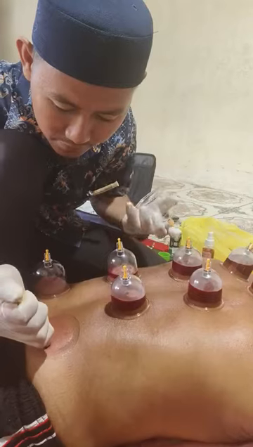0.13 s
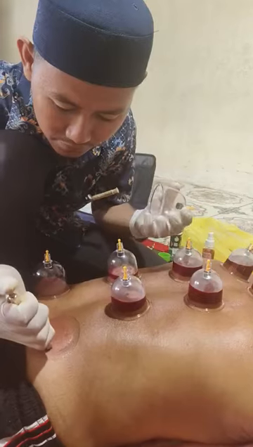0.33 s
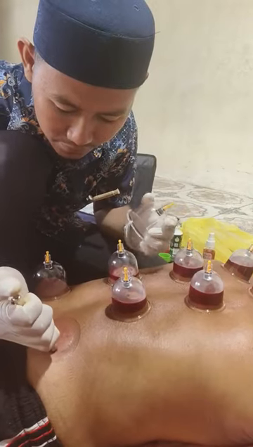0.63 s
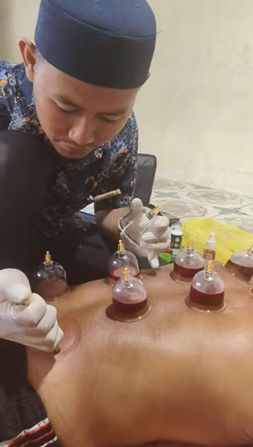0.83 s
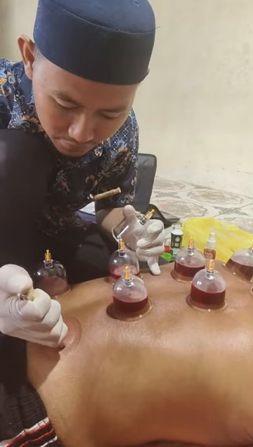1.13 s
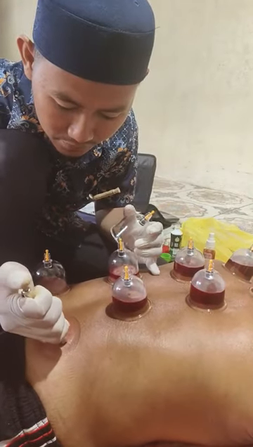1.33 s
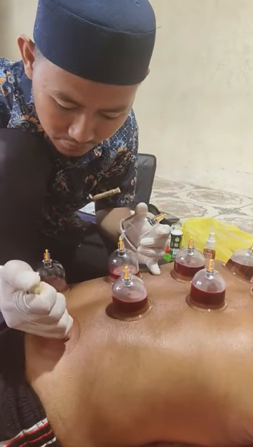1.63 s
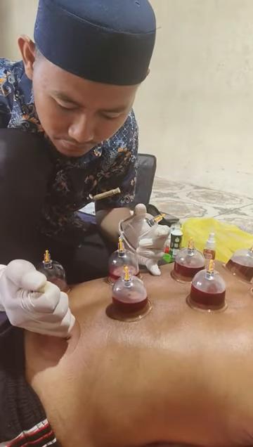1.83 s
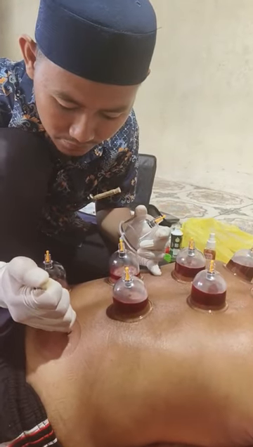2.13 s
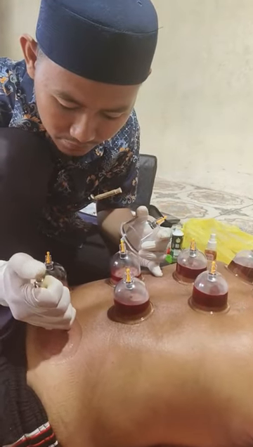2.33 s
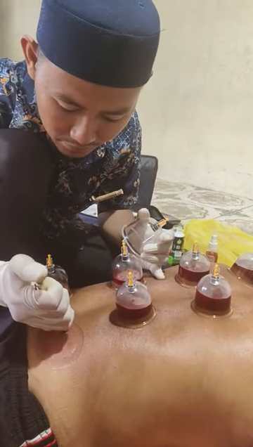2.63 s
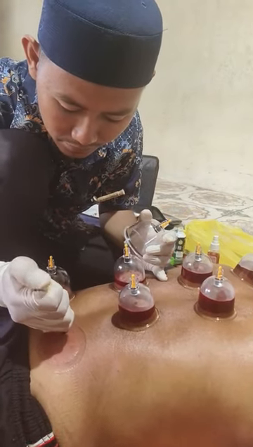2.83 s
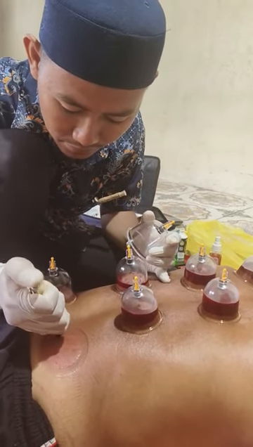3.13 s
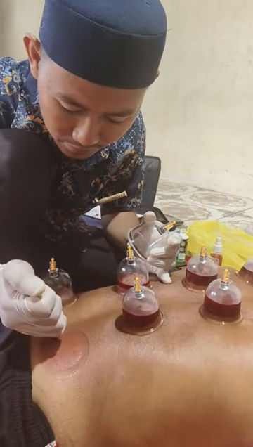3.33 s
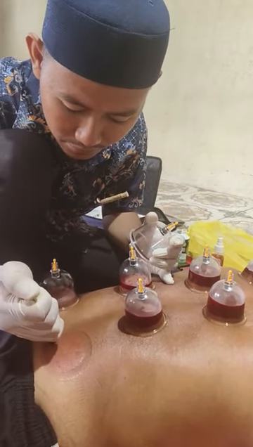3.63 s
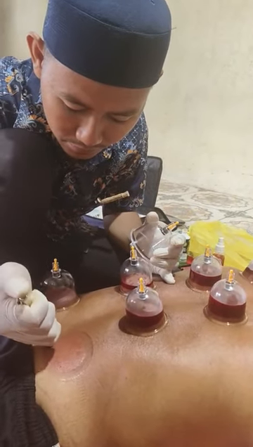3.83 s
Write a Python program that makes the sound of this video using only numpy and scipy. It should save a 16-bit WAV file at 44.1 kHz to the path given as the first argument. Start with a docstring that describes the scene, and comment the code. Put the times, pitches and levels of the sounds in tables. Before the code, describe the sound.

A spring-loaded lancing pen clicks sharply against skin twelve times, close by in a small hard room, each shot followed by the button ticking back. A muffled engine throbs outside, with a few dull thuds and faint glove rustles.

```python
"""Sharp little clicks: a spring-loaded lancing pen fires twelve times against skin in a small hard room.
Each shot is a trigger tick and, a few ms later, the plunger hitting its stop; then the button springs back.
A low throb, like a single-cylinder engine idling outside, fills the room. Under it lie soft rustles
of glove and sleeve, a faint thin whistle, a few dull thuds and a bed of rumble and hiss."""
import sys
import numpy as np
from scipy import signal
from scipy.fft import rfft, irfft, next_fast_len
from scipy.io import wavfile
from scipy.ndimage import map_coordinates

SR = 44100
rng = np.random.default_rng(int(sys.argv[2]) if len(sys.argv) > 2 else 0)


def dump(signal):
    """Clip the signal to [-1, 1] and save it as 16-bit WAV at the path in sys.argv[1]."""
    limited = np.clip(np.atleast_2d(signal).T, -1, 1)
    pcm = np.round(limited * 32767).astype(np.int16)
    wavfile.write(sys.argv[1], SR, pcm)


N = 176400
TIME = np.arange(N) / SR
CLICK_TIME = np.arange(SR // 4) / SR

# Each firing of the pen: start_s, trigger_db, plunger_db, travel_ms, left_over_right_db, ping_db
SHOTS = [(0.2541, -34, -30.5, 4.6, -2, -36.5), (0.6473, -31, -32, 3.4, 2, -31.5),
         (0.9968, -35.5, -29, 3.7, 1, -34.5), (1.3542, -31, -32.5, 2.9, 0.5, -33),
         (1.6789, -31, -30.5, 3.2, -0.5, -32), (1.9969, -32, -29.5, 3.1, 6, -30),
         (2.3018, -31.5, -32.5, 3.2, -1, -29.5), (2.5978, -35, -31, 4.1, -3.5, -30.5),
         (2.8913, -33, -30.5, 4.9, -2, -32), (3.1719, -34.5, -29, 2.7, 0, -37),
         (3.4745, -35, -27.5, 3.17, 2, -35), (3.7666, -32.5, -30.5, 3.56, 1, -33)]
PING_HZ, PING_T60_S, PING_RISE_S = 2605, 0.02, 0.0011


def pen_shots():
    """The trigger lets go, the barrel pings and the plunger slaps its stop."""
    out = np.zeros((2, N))
    for start_s, trigger_db, plunger_db, travel_ms, pan_db, ping_db in SHOTS:
        ping = ringing_tone(ping_db, PING_HZ * rng.normal(1, 0.008), PING_T60_S)
        ping *= 1 - np.exp(-CLICK_TIME / PING_RISE_S)
        shot = amp(trigger_db) * contact(crack_db=-2.5, crack_t60_s=0.027) + ping
        slap = amp(plunger_db) * contact(crack_db=1, crack_t60_s=0.0074, heavy=True)
        add(shot, travel_ms / 1000, slap)
        add(out, start_s, room(shot, pan_db, wet_db=-1))
    return out


# Each release of the button: start_s, level_db, catch_hz, left_over_right_db
BUTTON_RETURNS = [(0.3795, -37.5, 5070, 13), (0.7755, -36, 5670, 8.5), (1.1327, -32, 4820, 2),
                  (1.476, -33, 5100, -5), (1.805, -34.5, 5900, -5), (2.1194, -33, 5470, 2),
                  (2.4228, -34, 5370, 12), (2.7194, -35.5, 5080, -2), (3.0156, -31, 5450, -2),
                  (3.293, -33.5, 6180, 2), (3.5974, -32, 7200, 3), (3.887, -32.5, 6100, 1)]


def button_returns():
    """The button springs back: its catch rings over a light tick of the barrel."""
    out = np.zeros((2, N))
    for start_s, level_db, catch_hz, pan_db in BUTTON_RETURNS:
        catch = ringing_tone(level_db=-8.5, pitch_hz=catch_hz, t60_s=0.01)
        tick = contact(crack_db=-6, crack_t60_s=0.013, ring_db=-3)
        add(out, start_s, room(amp(level_db) * (catch + tick), pan_db, wet_db=-3))
    return out


# The barrel's resonances: pitch_hz, t60_s, light_tick_db, heavy_hit_db
BARREL_MODES = [(1180, 0.006, -38, 2), (1540, 0.0075, -13, 4), (2170, 0.0072, -31, -1.5),
                (4550, 0.0048, -2.5, -1.5), (5180, 0.012, -13, -11)]
# The bright EQ of a contact's crack: frequency_hz, gain_db
CRACK_EQ = [(500, -24), (1500, 13), (2700, 2), (3500, -8.5), (4700, 3.5), (7500, 3), (10200, 3.5),
            (12000, -3), (15500, 2)]
SNAP_DB, SNAP_T60_S = -2, 0.0038  # the first instant of each crack
SPRING_HZ, SPRING_WIDTH_HZ, SPRING_DB, SPRING_T60_S = 5000, 520, -32, 0.44


def contact(crack_db, crack_t60_s, heavy=False, ring_db=0):
    """Two parts meet inside the pen: the barrel rings, the hit cracks and the spring buzzes."""
    t = CLICK_TIME
    ring = np.zeros((2, len(t)))
    for pitch_hz, t60_s, light_db, heavy_db in BARREL_MODES:
        mode_db = (heavy_db if heavy else light_db) + ring_db + rng.normal(0, 1, (2, 1))
        cycles = pitch_hz * rng.normal(1, 0.015) * t + rng.normal(0, 0.24, (2, 1))
        ring += decay(mode_db, t60_s) * np.sin(2 * np.pi * cycles)
    crack = shaped_noise(len(t), lambda hz: amp(along(CRACK_EQ, hz)))
    crack *= decay(crack_db, crack_t60_s) + decay(crack_db + SNAP_DB, SNAP_T60_S)
    buzz = shaped_noise(len(t), lambda hz: 1 / (1 + ((hz - SPRING_HZ) / SPRING_WIDTH_HZ) ** 2))
    buzz *= decay(SPRING_DB, SPRING_T60_S)
    attack = 1 - np.exp(-t / 0.00049)
    return (ring + crack + buzz) * attack


def coil_ring():
    """The second shot leaves the coil spring ringing thinly."""
    out = np.zeros((2, N))
    add(out, start_s=0.652, sound=ringing_tone(level_db=-54, pitch_hz=5010, t60_s=0.47))
    return out


# Early reflections off the walls: delay_s, level_db
WALL_ECHOES = [(.0065, -18), (.0115, -15), (.0182, -12), (.036, -20)]
# Decay time of the reverb tail: frequency_hz, t60_s
TAIL_DECAY = [(300, 0.77), (2500, 0.31), (5000, 0.63), (9000, 0.32), (15000, 0.25)]
# EQ on the reverb tail: frequency_hz, gain_db
TAIL_EQ = [(300, -53), (1500, -21.5), (2600, 2), (5000, 1), (10000, 1.5), (15000, -0.5)]
ECHO_GRAIN_DB, TAIL_BUILD_S = 4, 0.00077


def room(click, pan_db, wet_db):
    """Hard walls answer a panned click with early echoes and a bright, grainy tail."""
    t = np.arange(SR // 3) / SR
    echoes = rng.standard_normal((2, len(t)))
    grain = np.interp(t, t[::50], rng.standard_normal(len(t[::50])))  # clumps into distinct echoes
    echoes *= amp(ECHO_GRAIN_DB * grain) * (1 - np.exp(-t / TAIL_BUILD_S))
    band_hz, frame_s, spectrum = signal.stft(echoes, SR, nperseg=256)
    spectrum *= amp(-60 * frame_s / along(TAIL_DECAY, band_hz)[:, None])
    _, tail = signal.istft(spectrum, SR, nperseg=256)
    impulse = filtered(tail / np.linalg.norm(tail[0]), lambda hz: amp(along(TAIL_EQ, hz)))
    for delay_s, level_db in WALL_ECHOES:
        for channel in impulse:
            add(channel, delay_s + rng.normal(0, 0.00045), amp([level_db]))
    impulse *= amp(wet_db)
    impulse[:, :1] += pan(pan_db)  # the direct sound
    return signal.fftconvolve(click, impulse, axes=1)


# The idle speed: time_s, firing_rate_hz
ENGINE_SPEED = [(0.25, 21.61), (0.9, 21.63), (1.5, 21.54), (2.1, 21.53), (2.7, 21.86), (3.3, 21.9),
                (4.0, 22.18)]
# Fader rides on the throb's two bands, ahead of their trims: time_s, low_db, upper_db
THROB_FADERS = [(.26, -34.5, -37), (.35, -31, -33), (.48, -26.5, -31.5), (.63, -28.5, -33.5),
                (.87, -29.5, -35.5), (.98, -31, -41), (1.21, -32.5, -39), (1.265, -30.5, -34.5),
                (1.34, -33, -40.5), (1.51, -35.5, -40), (1.62, -30, -36), (1.95, -35, -41),
                (2.35, -33, -39.5), (2.62, -31, -42), (3.0, -33.5, -41.5), (3.43, -39, -46),
                (3.88, -33.5, -45), (4, -36, -48)]
# Four exhaust colours in turn, a row per harmonic from the 4th: first_db, second_db, third_db, fourth_db
EXHAUST_HARMONICS = [(-13.5, -21, -20, -18.5), (-8.5, -4.5, -5.5, -1), (-2, -1, -8, -4),
                     (-8.5, -9, -9, -4.5), (-0.5, -6, -5.5, -12.5), (-9, -12, -18.5, -8.5),
                     (-14, -15, -15, -18.5), (-12, -16, -20, -16), (-10, -31, -19, -12.5),
                     (-14.5, -26.5, -20.5, -27.5), (-14, -17.5, -26, -25), (-12, -21.5, -14.5, -22),
                     (-9.5, -15.5, -12, -19), (-19, -17, -23, -25), (-19, -31, -26, -25.5),
                     (-26, -19.5, -31.5, -30), (-18.5, -26.5, -27, -22), (-16, -25, -25, -37),
                     (-26, -25, -36, -30), (-20.5, -27, -27, -31.5)]
COLOUR_SHIFTS_S, CROSSFADE_S = (0.99, 1.51, 2.42), 0.033
IDLE_HZ, BAND_SPLIT_HZ, FULL_WIDTH_HZ, WIDTH_RAD = 21.7, 205, 396, 0.71
EARLY_SCATTER_RAD, LATE_SCATTER_RAD = 0.96, 1.324  # distinct puffs until the first shift, then a blur
DRIFT_RAD, WAVER_DB, LOW_TRIM_DB, UPPER_TRIM_DB = 0.5, 2.7, -2, -1


def engine():
    """Exhaust harmonics, muffled by walls; many paths scatter their phases and make each waver."""
    firing_hz, = automation(ENGINE_SPEED)
    low_db, upper_db = automation(THROB_FADERS)
    firings = np.cumsum(firing_hz) / SR - 0.1026 + 0.004 * wobble(IDLE_HZ)  # a slightly uneven beat
    shifts = np.array([np.clip((TIME - s) / CROSSFADE_S + 0.5, 0, 1) for s in COLOUR_SHIFTS_S])
    scatter = EARLY_SCATTER_RAD + (LATE_SCATTER_RAD - EARLY_SCATTER_RAD) * shifts[0]
    bands, power = np.zeros((2, 2, N)), np.zeros((2, N))
    for harmonic, colours_db in enumerate(EXHAUST_HARMONICS, 4):
        pitch_hz = harmonic * IDLE_HZ
        gain = amp(colours_db[0] + np.diff(colours_db) @ shifts)
        phase = 2 * np.pi * harmonic * firings + scatter * rng.standard_normal()
        phase += DRIFT_RAD * wobble(rate_hz=3.5)
        width = WIDTH_RAD * min((pitch_hz / FULL_WIDTH_HZ) ** 2, 1) * rng.choice([-1, 1])
        waver = amp(WAVER_DB * wobble(rate_hz=5.92))
        band = int(pitch_hz > BAND_SPLIT_HZ)
        bands[band] += gain * waver * np.cos([phase + width, phase - width])
        power[band] += gain ** 2 / 2
    low, upper = bands / np.sqrt(power)[:, None]
    return amp(low_db + LOW_TRIM_DB) * low + amp(upper_db + UPPER_TRIM_DB) * upper * pan(2.5)


# Small moves of the hand: peak_s, width_s, level_db, centre_hz
RUSTLES = [(2.18, 0.11, -55, 1290), (2.42, 0.075, -53.5, 2100), (3.419, 0.18, -55, 1170)]
RUSTLE_OCTAVES = 0.46


def rustles():
    """Glove and sleeve slide in soft swells of midrange noise."""
    out = np.zeros((2, N))
    for peak_s, width_s, level_db, centre_hz in RUSTLES:
        friction = shaped_noise(N, lambda hz: bell(np.log2((hz + 1) / centre_hz), RUSTLE_OCTAVES))
        out += amp(level_db) * bell(TIME - peak_s, width_s) * friction
    return out


# Each swell of the whistle: start_s, length_s, pitch_hz, level_db
WHISTLES = [(3.025, 0.22, 10130, -63), (3.27, 0.13, 10350, -68), (3.683, 0.15, 10100, -71.5)]
WHISTLE_FLUTTER_DB, WHISTLE_WAVER_HZ = 3, 45


def whistle():
    """A faint, thin whistle flutters as it comes and goes."""
    out = np.zeros(N)
    for start_s, length_s, pitch_hz, level_db in WHISTLES:
        swell = np.sin(np.pi * np.clip((TIME - start_s) / length_s, 0, 1))
        flutter_db = WHISTLE_FLUTTER_DB * wobble(rate_hz=50)
        cycles = np.cumsum(pitch_hz + WHISTLE_WAVER_HZ * wobble(rate_hz=90)) / SR
        out += amp(level_db + flutter_db) * swell * np.sin(2 * np.pi * cycles)
    return out


# Each dull bump: peak_s, level_db
THUDS = [(0.935, -36), (1.65, -32.5), (2.131, -40), (2.255, -33)]
# Their bass-heavy EQ: frequency_hz, gain_db
THUD_EQ = [(20, -18), (45, -22), (70, -13), (110, -5), (250, -23), (600, -120)]
THUD_WIDTH_S = 0.017


def thuds():
    """Soft thuds: short, rounded bursts of low noise."""
    envelope = sum(amp(level_db) * bell(TIME - peak_s, THUD_WIDTH_S) for peak_s, level_db in THUDS)
    return envelope * room_noise(THUD_EQ)


# Fader rides on the room tone, ahead of its trims: time_s, rumble_db, hiss_db
ROOM_TONE_FADERS = [(.25, -70, -55), (.45, -56, -54), (.92, -54, -55.5), (1.05, -65, -55), (1.5, -76, -57),
                    (2.02, -61.5, -56), (2.15, -56, -55), (2.45, -60, -54), (2.9, -53.5, -56),
                    (3.45, -57, -53), (3.65, -56.5, -54), (4, -57, -55)]
# EQ of the rumble and of the hiss: frequency_hz, gain_db
RUMBLE_EQ = [(20, -23), (45, -8.5), (70, 2), (120, 0.5), (250, -7), (450, -11), (700, -54), (2000, -120)]
HISS_EQ = [(100, -14), (500, 5.5), (900, 3), (1500, -1.5), (2500, -1), (3500, -11.5), (5000, -13),
           (6500, -17.5), (9500, -22), (12000, -32), (15500, -29)]
RUMBLE_TRIM_DB, HISS_TRIM_DB = 13.5, 5.5


def room_tone():
    """A low rumble rises and sinks under a nearly steady hiss."""
    rumble_db, hiss_db = automation(ROOM_TONE_FADERS)
    rumble = amp(rumble_db + RUMBLE_TRIM_DB) * room_noise(RUMBLE_EQ)
    hiss = amp(hiss_db + HISS_TRIM_DB) * room_noise(HISS_EQ)
    return rumble + hiss


# Stereo image of the room's noise: frequency_hz, left_right_correlation
STEREO_IMAGE = [(30, 0.38), (120, 0.9), (300, 1), (600, -0.39), (2000, -0.19), (10000, -0.097)]


def room_noise(eq):
    """Coloured noise of rms 1, centred in the upper bass and wide from the mids up."""
    def mid_side_gains(hz):
        angle = np.arccos(along(STEREO_IMAGE, hz)) / 2
        return amp(along(eq, hz)) * [np.cos(angle), np.sin(angle)]
    mid, side = filtered(rng.standard_normal((2, N)), mid_side_gains)
    return unit_rms(np.array([mid + side, mid - side]))


def shaped_noise(samples, response):
    """Filtered noise of rms 1, independent left and right."""
    return unit_rms(filtered(rng.standard_normal((2, samples)), response))


def ringing_tone(level_db, pitch_hz, t60_s):
    """One struck resonance: a dying sine."""
    return decay(level_db, t60_s) * np.sin(2 * np.pi * pitch_hz * CLICK_TIME)


def decay(level_db, t60_s):
    """A click's envelope, falling 60 dB every t60_s."""
    return amp(level_db - 60 * CLICK_TIME / t60_s)


def bell(offset, width):
    """A Gaussian hump of height 1."""
    return np.exp(-(offset / width) ** 2 / 2)


def wobble(rate_hz):
    """A smooth random curve through rate_hz points a second."""
    t = np.arange(0, N + 200, 200) / SR
    curve = map_coordinates(rng.standard_normal(400), [t * rate_hz + 4], mode="mirror")
    return np.interp(TIME, t, curve)


def automation(rows):
    """One value per sample for each column after the time."""
    time_s, *columns = np.transpose(rows)
    return [np.interp(TIME, time_s, column) for column in columns]


def along(points, hz):
    """(frequency_hz, value) points read on a log axis."""
    point_hz, values = np.transpose(points)
    return np.interp(np.log(hz + 1), np.log(point_hz + 1), values)


def filtered(x, response):
    """x shaped by a gain for each frequency."""
    samples = x.shape[-1]
    padded = 2 * next_fast_len(samples // 2 + 2048)
    gains = response(np.fft.rfftfreq(padded, 1 / SR))
    return irfft(rfft(x, padded) * gains, padded)[..., :samples]


def amp(db):
    """Decibels to gain."""
    return 10 ** (np.asarray(db) / 20)


def pan(left_over_right_db):
    """Left and right gains, as a column."""
    return amp([[left_over_right_db / 2], [-left_over_right_db / 2]])


def unit_rms(x):
    """Scaled to rms 1."""
    return x / np.sqrt(np.mean(x ** 2) + 1e-20)


def add(track, start_s, sound):
    """Mix a sound in at start_s."""
    part = track[..., max(round(start_s * SR), 0):][..., :sound.shape[-1]]
    part += sound[..., :part.shape[-1]]


def scene():
    """The pen close by, the engine and the room behind it."""
    pen = pen_shots() + button_returns() + coil_ring()
    return pen + rustles() + whistle() + engine() + room_tone() + thuds()


SILENCE_S, FADE_IN_S, HIGH_CUT_HZ = 0.2386, 0.026, 15900


def record(dry):
    """A moment of silence, a quick fade-in and a steep high cut on the whole mix."""
    fade_in = np.clip((TIME - SILENCE_S) / FADE_IN_S, 0, 1)
    return filtered(dry * fade_in, lambda hz: np.clip((HIGH_CUT_HZ - hz) / 200 + 0.5, 0, 1))


dry = scene()
out = record(dry)
dump(out)
```